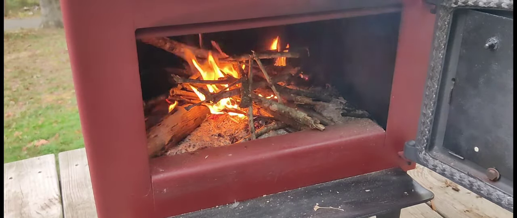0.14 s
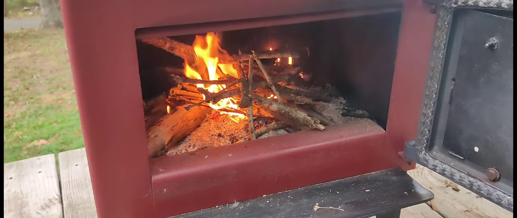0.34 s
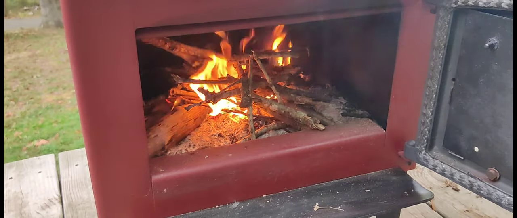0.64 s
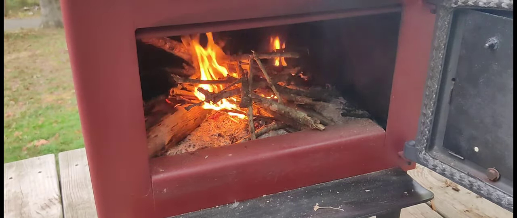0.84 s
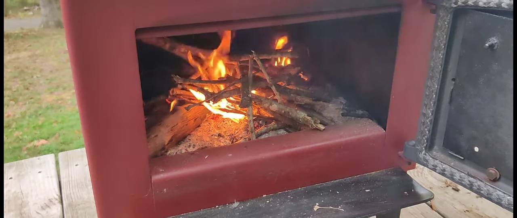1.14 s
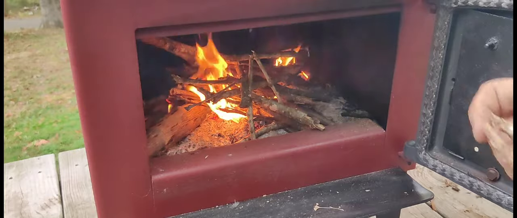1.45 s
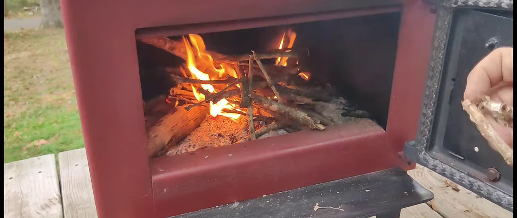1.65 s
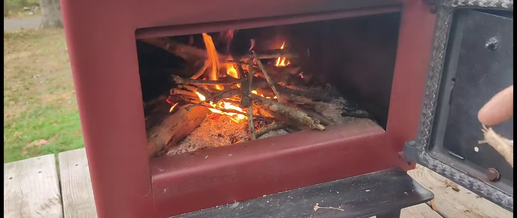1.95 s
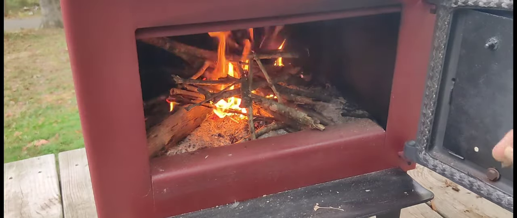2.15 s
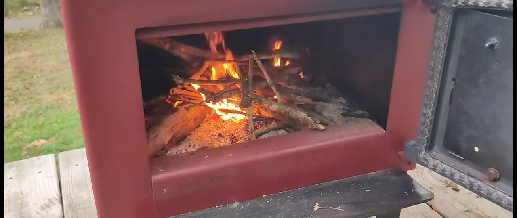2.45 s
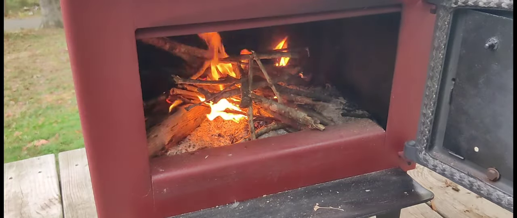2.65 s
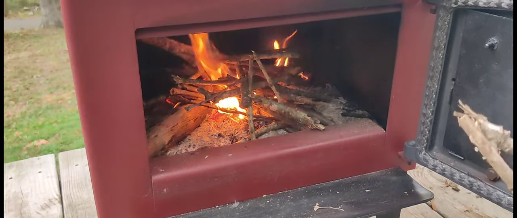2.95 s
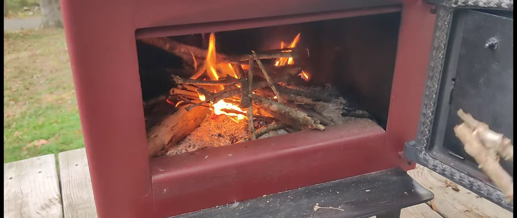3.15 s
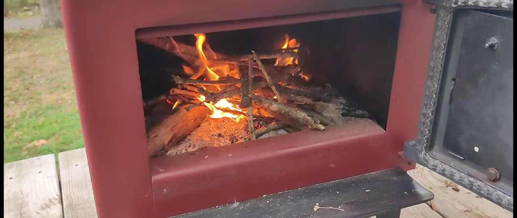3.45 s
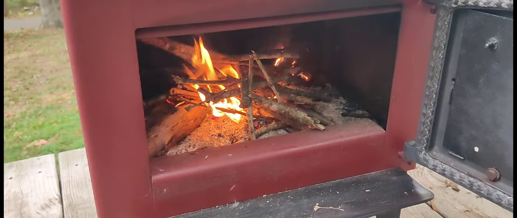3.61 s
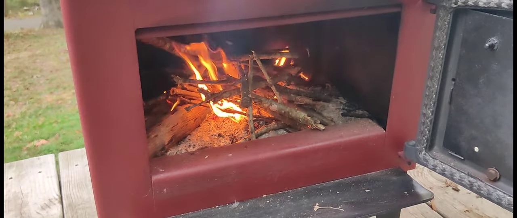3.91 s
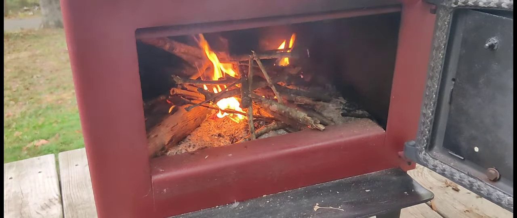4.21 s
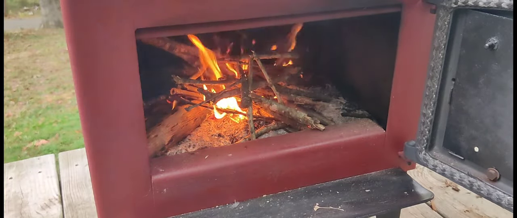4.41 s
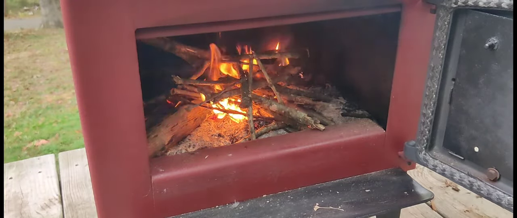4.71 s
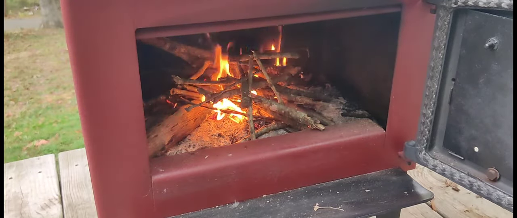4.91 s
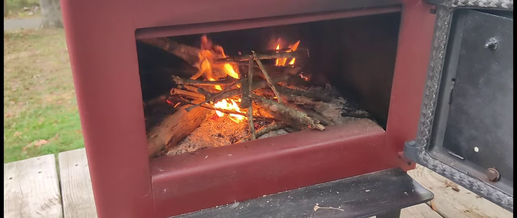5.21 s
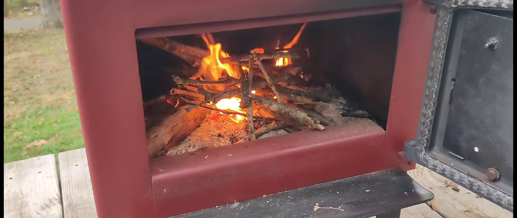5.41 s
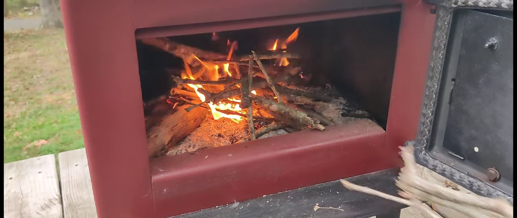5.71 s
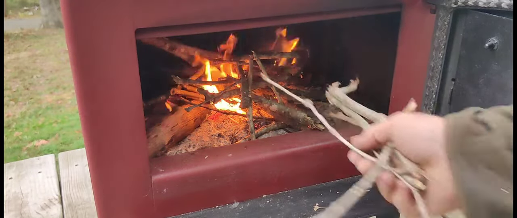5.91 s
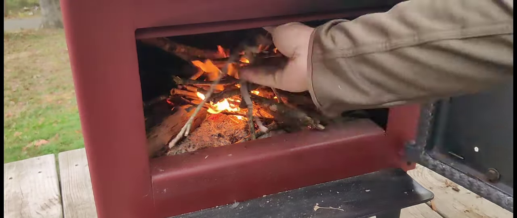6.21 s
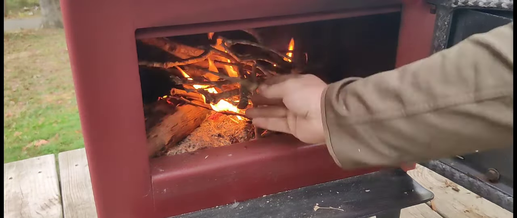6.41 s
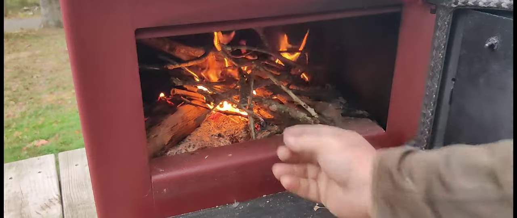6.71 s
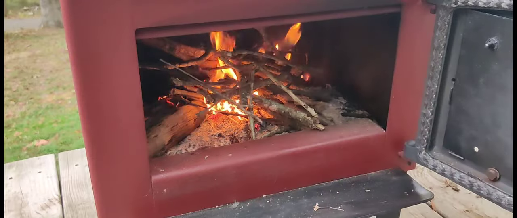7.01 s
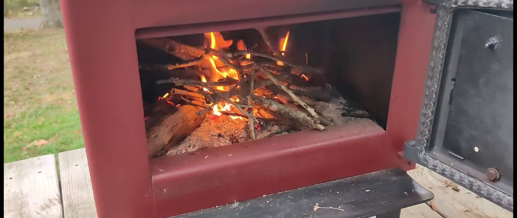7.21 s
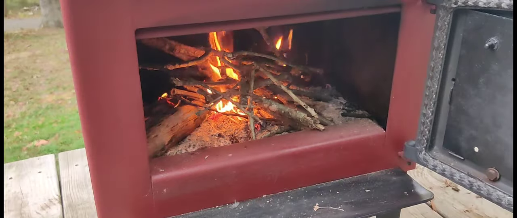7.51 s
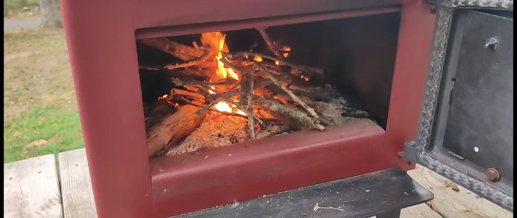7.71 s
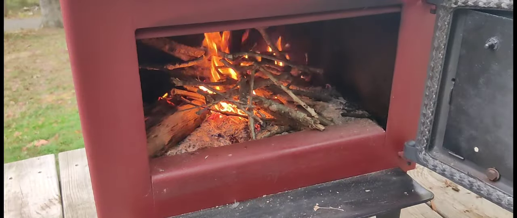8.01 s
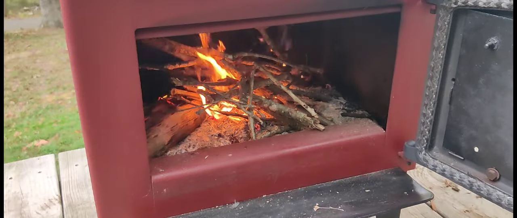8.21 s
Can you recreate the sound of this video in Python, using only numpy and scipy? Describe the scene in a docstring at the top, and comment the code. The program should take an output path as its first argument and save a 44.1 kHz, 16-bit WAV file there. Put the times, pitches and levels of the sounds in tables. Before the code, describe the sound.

A close outdoor stereo scene beside an open iron stove. From 0 s, low wind buffets push mainly on the right, over a faint wavering engine hum, a fast high insect chirp and brief songbird whistles and buzzes. Small dry snaps and sleeve swishes begin around 0.4 s; sticks rub, rasp and crack at 1.2-2.1 s, then more sparsely. At 3.35-3.45 s comes the loudest moment, a hard, sharp multiple break with a woody knock and puff of air, followed by smaller cracks to 4.8 s. A distant crow gives six short, echoing caws from 4.4 to 6.3 s. At 6.3-6.65 s sticks tumble into the firebox with low wooden thuds and dull, short iron ringing. Handling nearly stops around 7 s, leaving tiny fire ticks, birds and air, which dips briefly near 7.4 s. Soft low knocks, scrapes and little cracks return from 7.8 s to the end at about 8.3 s.

```python
"""Wind on the microphone, a far engine's hum and a chirping insect come first, with songbirds calling over them.
Close by, dry sticks are gathered, snapped and dropped into an open iron stove outdoors, which rings dully as
a small fire ticks; far off a crow calls six times. Wood is bursts and rubbing of noise plus decaying modes,
the stove is a bank of iron modes, wind and air are coloured noise, and the hum, insect and bird calls are
wavering tones. Two microphone ports pick it all up, the right one exposed to the gusts."""
import sys
import numpy as np
from scipy import signal
from scipy.fft import rfft, irfft, next_fast_len
from scipy.io import wavfile
from scipy.ndimage import uniform_filter1d, map_coordinates

SR = 44100
rng = np.random.default_rng(int(sys.argv[2]) if len(sys.argv) > 2 else 0)


def output_pcm(signal):
    """Save a mono or channel-first signal as 16-bit PCM at the path in sys.argv[1].

    Samples are clipped to [-1, 1] before scaling.
    """
    pcm = np.clip(np.atleast_2d(signal).T, -1, 1) * 32767
    wavfile.write(sys.argv[1], SR, np.round(pcm).astype(np.int16))


N = 368235  # length in samples


def amp(db):
    """Decibels to gain."""
    return 10 ** (np.asarray(db) / 20)


def unit(x):
    """Scale to rms 1."""
    return x / np.sqrt(np.mean(x ** 2) + 1e-20)


def along(points, hz):
    """(Hz, value) points read on a log axis."""
    f, v = np.transpose(points)
    return np.interp(np.log(hz + 1), np.log(f), v)


def curves(rows):
    """One value per sample for each column after the time."""
    s, *cols = np.transpose(rows)
    return [np.interp(np.arange(N) / SR, s, c) for c in cols]


def wobble(rate, size=N):
    """A smooth random curve, rate knots a second."""
    knots = rng.standard_normal(int(size * rate / SR) + 4)
    return map_coordinates(knots, [np.arange(size) * rate / SR])


def filtered(x, response):
    """x times a response of frequency."""
    m = next_fast_len(N + SR // 2)
    return irfft(rfft(x, m) * response(np.fft.rfftfreq(m, 1 / SR)), m)[..., :N]


def coloured(x, spectrum, keep_power=True, size=4096):
    """Causal (minimum-phase) filter through (Hz, dB) points."""
    cepstrum = irfft(np.log(amp(along(spectrum, np.fft.rfftfreq(size, 1 / SR)))))
    # folding the cepstrum forward in time makes the filter causal
    cepstrum[1:size // 2] *= 2
    cepstrum[size // 2 + 1:] = 0
    kernel = irfft(np.exp(rfft(cepstrum)))
    if keep_power:
        kernel = kernel / np.linalg.norm(kernel)
    return signal.fftconvolve(np.atleast_2d(x), kernel[None], axes=1)[:, :N]


def pair(alike, size=N):
    """Two white noises that share a part, from 0 (separate) to 1 (identical)."""
    a, b, common = rng.standard_normal((3, size))
    share = np.clip(alike, 0, 1)
    return np.sqrt(1 - share) * np.array([a, b]) + np.sqrt(share) * common


def pan(db):
    """Left and right gains for a level difference, positive to the left."""
    return amp([[db / 2], [-db / 2]])


def add(track, s, sound):
    """Mix a sound into a track at s seconds."""
    start = max(round(s * SR), 0)
    track[..., start:start + sound.shape[-1]] += sound[..., :N - start]


def echo(x, t60):
    """Diffuse stereo reflections: decaying noise with about unit energy."""
    t = np.arange(SR) / SR
    tail = rng.standard_normal((2, SR)) * amp(-60 * t / t60) * (1 - np.exp(-t / 0.00057))
    return signal.fftconvolve(np.atleast_2d(x), tail / np.linalg.norm(tail[0]), axes=1)[:, :N]


def swell(s, length):
    """A gain that rises smoothly to 1 at s seconds and falls again."""
    return np.exp(-np.minimum((2 * (np.arange(N) / SR - s) / length) ** 2, 30))


def from_yard(x, lag_s=0.00036):
    """Sound from the yard reaches the left port later."""
    return filtered(x, lambda hz: np.exp(-2j * np.pi * hz * np.array([[lag_s], [0]])))


# Wood fibres breaking close to the microphone. Each row: start in seconds, crack level in dB, thud in dB
# relative to the crack, tearing t60 in seconds, left over right in dB, gain of the top octave in dB.
FIBRE_BREAKS = [(.3764, -42.5, -22, .027, 2, 0), (0.409, -38, -4.5, .02, 1, 2),
                (0.427, -34.5, -20, 0.0263, -1, 7), (0.446, -40.5, -17, .018, -7, 1),
                (.4924, -30, -33, 0.017, -1, -3), (0.5528, -47.5, -12, .03, -11, 2),
                (.654, -49, -22, .012, 0, 5), (.931, -54, -17, .01, -9, 5), (1.042, -43, -20, .01, -8, -6),
                (1.239, -43, -14, 0.017, -3, 1), (1.245, -44.5, 1, .02, -13.5, -6),
                (1.257, -39, -15, 0.019, -7.5, -6.5), (1.265, -32, -22, .012, -4, -14.5),
                (1.306, -38, -17, .012, -3, -7), (1.577, -47, -20, .015, 2, 7),
                (1.587, -34, -27, 0.097, -2, -2), (1.597, -51.5, -16, .022, -6, -7),
                (1.691, -50, -20, .012, 1, 4), (1.696, -37.5, -24, 0.01, 0, 7),
                (1.713, -53, -19, .018, -4, 15), (1.769, -31.5, -16, 0.041, -4, -12),
                (1.78, -46, 5, .027, -4, 0), (1.813, -46, -20, 0.017, -6, 6),
                (1.832, -45, -12, .014, -1.5, 9), (1.872, -40, -6, .024, 2, -2),
                (2.0212, -45.5, -7.5, .018, -5.5, -2), (2.127, -44, -0.5, 0.04, -14, -2),
                (2.455, -43.5, -21, 0.066, -6, 0.5), (2.635, -40, -17, 0.0088, -5, -21),
                (2.734, -42.5, -6, .009, 0, -7), (2.998, -47, -18, .01, 5, 0),
                (3.277, -40.5, -10, 0.015, -6, -7), (3.312, -44.5, -18, .022, -3, 5),
                (3.33, -40, -7, 0.04, 2, 4), (3.3464, -12, -20, 0.0049, -7.5, -3),
                (3.3928, -20, -3.5, 0.027, -6.5, -1), (3.394, -17.5, -12.5, 0.022, 6, 3),
                (3.4046, -39, -22, .02, 2.5, 0), (3.416, -22.5, -26, 0.032, 4, 3),
                (3.431, -41, -20, .02, 9, -1), (3.454, -42.5, -2, .02, 12.5, -1),
                (3.5608, -37.5, -6.5, 0.016, -4, 3.5), (3.568, -42.5, -12, .012, 0, 5),
                (3.575, -44, -4, .022, 10, -2), (3.664, -36.5, -4, 0.017, -7, -3),
                (3.68, -43.5, -22, .012, -6, 2), (3.687, -45, -20, .012, -5, -2.5),
                (3.6959, -23, -11.5, 0.014, -3.5, -8), (3.788, -45, -22, .01, -12, -5),
                (3.8168, -28.5, -35, 0.011, -8, -4.5), (3.9582, -42.5, -20, 0.029, -8.5, -3),
                (3.973, -49, -22, .012, -4, 4), (4.007, -52, -20, .01, -5, 9),
                (4.0237, -34.5, -2, 0.033, -3.5, -6), (4.0315, -41, 1, .02, -5, -7),
                (4.381, -51, -22, 0.011, -11, 4), (4.497, -33, -28, 0.023, -6, -0.5),
                (4.537, -39, -6, .012, -5, -12), (4.605, -26, -20, 0.0098, -4.5, 3),
                (4.654, -51, -25, .008, -11, 6), (4.717, -41, -25, 0.007, -13, -3),
                (4.8025, -38.5, -13, 0.01, -7, -14), (5.176, -45, -20, .01, -7, -18),
                (5.59, -44, -22, .01, -4, 2), (5.724, -44, -20, .01, 1, 0), (5.77, -43, -20, .01, -4, -15),
                (6.3, -49, 4, .02, 5, 3), (6.4366, -38, -13, 0.026, 1.5, -4),
                (6.4662, -36.5, -22, 0.013, 0, -3), (6.4972, -51.5, -15, 0.036, 18, 10),
                (7.7907, -47, -20, .02, 4, -7), (7.889, -44, -6, 0.024, 3, -8),
                (7.98, -52.5, 6, 0.022, 2, -6), (8.022, -45.5, -5, 0.033, 10, -2),
                (8.066, -51.5, -17, 0.011, 3, 5)]
# Modes of the thick stick that breaks. Each row: pitch in Hz, level in dB, t60 in seconds.
THICK_STICK_MODES = [(1500, -11, 0.015), (2374, -3, 0.013), (2644, -6, 0.017), (3750, -7.5, 0.01),
                     (5030, 5, 0.0095)]
# Colour of a sharp crack, also worn by the fire's ticks. Each row: frequency in Hz, relative level in dB.
CRACK_COLOUR = [(200, -34), (1000, -19.5), (2300, -13.5), (3500, -10), (5000, -1), (7500, 8), (10000, 3.5),
                (14000, 3.5), (16000, 3.5)]
# Colour of the woody thud. Each row: frequency in Hz, relative level in dB.
THUD_COLOUR = [(80, -3), (200, 9.5), (400, 0), (700, 3.5), (1400, -6), (2300, 0.5), (4000, -9), (9000, -41)]
STICK_DB, STICK_GROWS = -5.5, 1.6  # only hard breaks ring it: level, growth with the snap
SHEEN_HZ = 8340  # where the top octave of a snap begins


def snaps(ring_db=-17, ring_t60=0.015, rise_s=0.00089):
    """Each break: a sharp crack, a fast run of tearing fibres, a brief ring of random high tones, a woody thud."""
    cracks, thuds, stick = np.zeros((3, 2, N))
    t = np.arange(SR // 8) / SR
    rise = 1 - np.exp(-t / rise_s)
    modes = [amp(db - 60 * t / t60) * np.sin(2 * np.pi * hz * t) for hz, db, t60 in THICK_STICK_MODES]
    stick_ring = rise * sum(modes)
    dull = signal.butter(2, SHEEN_HZ, fs=SR, output="sos")
    for s, db, thud_db, t60, side_db, sheen_db in FIBRE_BREAKS:
        fibres = amp(4.5 * unit(uniform_filter1d(rng.standard_normal(len(t)), size=24)))
        edge = amp(-60 * t / 0.005)
        tearing = .38 * fibres * amp(-60 * t / max(t60, .004))
        tear = pair(0.28, size=len(t)) * (edge + tearing)
        tones_hz = rng.uniform(2000, 10860, size=(12, 1))  # random tones for each snap
        ring = unit(np.sin(2 * np.pi * tones_hz * t).sum(0)) * amp(ring_db - 60 * t / ring_t60)
        burst = rise * (tear + ring)
        burst = burst / np.std(burst[:, :SR // 500])  # level set by the first 2 ms
        low = signal.sosfiltfilt(dull, burst)
        thud = pair(0.69, size=len(t)) * rise * amp(-60 * t / 0.03)
        add(cracks, s, amp(db) * pan(side_db) * (low + amp(sheen_db) * (burst - low)))
        add(thuds, s, amp(db + thud_db) * pan(side_db) * thud)
        add(stick, s, amp(STICK_DB + STICK_GROWS * db) * pan(-6.0) * stick_ring)
    return coloured(cracks, CRACK_COLOUR) + amp(-5.0) * coloured(thuds, THUD_COLOUR) + stick


def puff(s=3.394, suction_s=0.012, rebound_s=0.099, rebound=0.43):
    """The breaking stick throws air at the right port: one suction and a slow rebound."""
    t = np.maximum(np.arange(N) / SR - s, 0)

    def bump(peak_s):
        return t / peak_s * np.exp(1 - t / peak_s)

    right_only = amp(-6.2) * np.array([[0], [1]])
    return right_only * (rebound * bump(rebound_s) ** 6 - bump(suction_s))


# Sticks bumping the deck and the stove. Each row: start in seconds, level in dB, centre of the blow in Hz,
# its t60 in seconds, iron ring in dB relative to that level.
STICK_KNOCKS = [(1.383, -39, 817, 0.065, -27), (1.592, -52, 1050, 0.086, -2), (1.685, -47, 1244, .08, -1.5),
                (1.77, -58, 1210, .08, 8.5), (3.393, -17.5, 1426, 0.016, -35),
                (3.394, -30.5, 703, 0.02, -29), (6.339, -46, 1920, .06, -15), (6.341, -47, 555, 0.07, -6),
                (6.345, -41.5, 1096, 0.12, -7), (6.354, -39.5, 1133, 0.13, -22),
                (6.414, -32, 429, 0.13, -17), (6.442, -23.5, 790, 0.086, -19),
                (6.447, -29, 657, 0.042, -21.5), (6.474, -34, 733, 0.13, -14.5),
                (6.492, -43, 890, 0.052, -14), (6.52, -41, 790, 0.1, -23), (6.565, -52, 595, .06, -14),
                (6.645, -48, 694, 0.13, -22), (7.926, -38, 197, 0.083, -25), (7.929, -42, 716, 0.092, -22),
                (7.936, -39.5, 459, 0.27, -19), (7.952, -43, 690, .08, -27), (7.973, -43, 640, 0.071, -34),
                (7.987, -47, 358, 0.13, -24), (8.08, -44.5, 398, 0.15, -27), (8.128, -44, 975, .11, -24),
                (8.138, -43, 405, 0.11, -20), (8.193, -48, 654, 0.069, -26),
                (8.276, -41.5, 498, 0.085, -25), (8.335, -36, 420, .1, -25)]
# Modes of the firebox with its load. Each row: pitch in Hz, level in dB, t60 in seconds.
IRON_MODES = [(418, -7.5, 0.38), (538, -8.5, 0.32), (594.4, 1, 0.32), (632, -11, 0.54), (699, -5, 0.37),
              (763, -1.5, 0.33), (826, -8, .4), (870, -7, 0.42), (987, -8.5, 0.52), (1090, -16.5, 0.6),
              (1120, -23, 0.48), (1520, -13.5, 0.43), (1760, -25, .3), (1950, -19.5, .2)]
# Modes of a bumped stick. Each row: ratio to the centre of the blow, level in dB.
WOOD_MODES = [(.82, -7.5), (1, -1), (1.19, -16)]


def firebox(spread=0.48, contact_s=0.0026, clatter_db=-5):
    """Each bump knocks the stick's own short modes, with a little clatter, and rings iron modes near that pitch."""
    out = np.zeros((2, N))
    t = np.arange(SR * 3 // 5) / SR
    hz, level_db, t60 = np.transpose(IRON_MODES)[:, :, None]
    ratio, wood_db = np.transpose(WOOD_MODES)[:, :, None]
    for s, db, centre_hz, knock_t60, ring_db in STICK_KNOCKS:
        octaves_off = np.log2(hz / centre_hz)
        strength = amp(level_db + rng.normal(0, 1.6, hz.shape)) / (1 + (octaves_off / spread) ** 4)
        # phases differ a little between the ports
        phase = rng.uniform(0, 2 * np.pi, hz.shape) + rng.normal(0, 0.47, (2, len(hz), 1))
        ring = np.sum(strength * amp(-60 * t / t60) * np.sin(2 * np.pi * hz * t + phase), axis=1)
        wood_hz = centre_hz * ratio * (1 + rng.normal(0, 0.03, ratio.shape))
        wood = np.sum(amp(wood_db) * np.sin(2 * np.pi * wood_hz * t), axis=0)
        band = signal.butter(2, [centre_hz * 0.73, centre_hz * 1.21], "band", fs=SR, output="sos")
        clatter = unit(signal.sosfilt(band, pair(0.24, size=len(t))))
        knock = (wood + amp(clatter_db) * clatter) * amp(-60 * t / knock_t60)
        onset = 1 - np.exp(-t / contact_s)
        add(out, s, amp(db) * onset * (amp(ring_db) * ring + amp(-7.0) * knock))
    return out


# Faint rustle while the hands are busy near the microphone. Each row: time in seconds, level in dB.
BUSY_HANDS = [(0, -68), (.35, -62.5), (.9, -63), (2.55, -60), (2.9, -66.5), (3.5, -61), (3.8, -59.5),
              (4.7, -58.5), (5.3, -61.5), (6.5, -63.5), (6.8, -72.5), (7.3, -78.5), (7.85, -85),
              (7.9, -58.5), (8.35, -71)]
# Strokes of the sleeve. Each row: peak in seconds, length in seconds, level in dB.
SLEEVE_STROKES = [(0.43, 0.066, -42.5), (0.553, 0.081, -50), (0.778, 0.033, -51.5), (0.923, 0.19, -53),
                  (1.113, 0.11, -44), (1.366, 0.23, -50), (1.714, 0.11, -53.5), (1.853, 0.1, -47),
                  (2.014, 0.044, -49), (2.15, 0.05, -49.5), (2.468, 0.29, -60), (2.573, 0.09, -58),
                  (2.738, 0.041, -49), (3.426, 0.052, -43.5), (3.575, 0.029, -46.5), (4.187, 0.042, -49.5),
                  (4.48, 0.27, -55.5), (4.708, 0.098, -47.5), (5.006, 0.04, -51.5), (5.354, 0.096, -56.5),
                  (5.58, 0.038, -41.5), (5.696, 0.2, -57), (6.309, 0.094, -50), (6.478, 0.14, -53),
                  (7.993, 0.19, -61)]
# Sticks dragged over one another. Each row: peak in seconds, length in seconds, bark rasp in dB, dull scrape in dB.
STICK_DRAGS = [(1.273, 0.12, -60, -55), (1.401, 0.13, -55, -50), (1.593, 0.036, -47, -57),
               (1.657, 0.079, -44.5, -65), (1.782, 0.047, -54.5, -69), (2.144, 0.06, -57, -56),
               (3.425, 0.072, -55, -51), (3.638, 0.12, -70, -53), (3.704, 0.028, -46.5, -59),
               (3.838, 0.11, -61, -50.5), (4.067, 0.039, -54.5, -77), (4.546, 0.15, -58.5, -61.5),
               (5.674, 0.078, -61, -60.5), (6.353, 0.068, -70, -49), (6.442, 0.09, -80.5, -53.5),
               (6.59, 0.16, -65, -60), (7.963, 0.06, -73, -54), (8.025, 0.041, -58, -58),
               (8.16, 0.21, -65.5, -59.5)]
FIDGET_DB, FIDGET_RATE = 3, 9  # unevenness of the rustle: depth, random knots a second
SLEEVE_RASP_DB, SLEEVE_SCRAPE_DB = -11.5, -33  # each stroke shifts the held sticks a little
BUSY_RASP_DB, BUSY_SCRAPE_DB = -2, -5  # bark and scrape in the busy rustle


def handling():
    """Strength of swish, rasp and scrape: sleeve strokes and dragged sticks over a fidgeting rustle."""
    busy_db, = curves(BUSY_HANDS)
    busy = amp(busy_db + FIDGET_DB * wobble(FIDGET_RATE))
    sleeve = sum(amp(db) * swell(s, length) for s, length, db in SLEEVE_STROKES)
    bark, dull = sum(amp([[rasp_db], [scrape_db]]) * swell(s, length)
                     for s, length, rasp_db, scrape_db in STICK_DRAGS)
    swishing = np.hypot(sleeve, busy)
    rasping = np.hypot(bark + amp(SLEEVE_RASP_DB) * sleeve, amp(BUSY_RASP_DB) * busy)
    scraping = np.hypot(dull + amp(SLEEVE_SCRAPE_DB) * sleeve, amp(BUSY_SCRAPE_DB) * busy)
    return swishing, rasping, scraping


# Colour of cloth sliding on cloth. Each row: frequency in Hz, relative level in dB.
SWISH_COLOUR = [(3000, -42), (6000, -4), (8000, -1), (11000, -0.5), (14000, -1.5), (16000, -2.5)]
# Colour of rasping bark. Each row: frequency in Hz, relative level in dB.
BARK_COLOUR = [(500, -13.5), (1200, -3.5), (2300, -2), (4000, 2), (5800, 2), (7500, 5), (11000, -5.5)]
# Colour of the dull scrape. Each row: frequency in Hz, relative level in dB.
SCRAPE_COLOUR = [(100, -4), (250, 13), (450, 5.5), (800, 2), (1300, -5.5), (2500, -6), (5000, -11),
                 (10000, -50)]


def rustle(grain_rate=230, spread_db=2.0):
    """A sleeve swishes; bark catches and slips in dense tiny grains over a duller, uneven scrape."""
    swishing, rasping, scraping = handling()
    sizes = (rng.random(N) < grain_rate / SR) * amp(spread_db * np.minimum(rng.exponential(size=N), 4))
    grains = signal.lfilter([1], [1, -np.exp(-1 / (0.00068 * SR))], sizes)  # decay constant 0.68 ms
    swish = coloured(unit(pair(0.16) * (grains + 1.9)), SWISH_COLOUR)
    grit = unit(pair(.2) * (grains + .9))
    rasp = coloured(grit, BARK_COLOUR) * pan(-2.8)
    uneven = amp(4.3 * np.tanh(wobble(70)))
    scrape = coloured(unit(pair(0.41) * uneven), SCRAPE_COLOUR) * pan(-1.3)
    return swishing * swish + rasping * rasp + scraping * scrape


def embers(rate=16, spread_db=1.5):
    """Tiny gas pockets burst at random in the burning twigs, rate a second; their level follows the open air's."""
    sizes = (rng.random(N) < rate / SR) * amp(spread_db * np.minimum(rng.exponential(size=N), 3))
    ticks = signal.lfilter([1], [1, -np.exp(-1 / (0.00014 * SR))], sizes)
    air_db, = curves(OPEN_AIR)
    return amp(air_db + 5) * pan(-4) * coloured(ticks * pair(0.64), CRACK_COLOUR)


# Light breeze on both microphone ports. Each row: time in seconds, buffet level in dB.
LIGHT_BREEZE = [(0, -66), (.65, -54), (1.3, -45.5), (1.8, -52), (2.25, -38.5), (2.6, -62), (3.35, -42.5),
                (3.7, -46.5), (4.3, -46), (4.85, -39), (5.1, -35.5), (5.5, -44), (5.95, -36.5), (6.5, -39),
                (6.9, -54.5), (7.35, -63), (7.65, -45.5), (8.35, -41)]
# Gusts on the exposed right port. Each row: peak in seconds, length in seconds, buffet level in dB.
PORT_GUSTS = [(0.2, 0.37, -27.5), (1.039, 0.057, -28), (1.707, 0.075, -33), (1.99, 0.28, -33),
              (2.214, 0.096, -30), (2.429, 0.052, -25), (2.544, 0.19, -29), (2.745, 0.12, -20.5),
              (2.979, .22, -25.5), (3.298, 0.037, -29.5), (3.42, 0.031, -27), (4.178, 0.17, -34.5),
              (4.366, 0.19, -34.5), (4.45, 0.031, -30), (4.535, 0.034, -33.5), (4.63, 0.14, -28.5),
              (4.776, 0.025, -24), (4.843, 0.062, -22.5), (4.93, 0.086, -27), (5.047, 0.13, -27),
              (5.147, 0.078, -23.5), (5.354, 0.14, -28), (5.645, 0.094, -30.5), (6, 0.018, -18),
              (6.108, 0.11, -33), (6.376, 0.041, -21.5), (6.438, 0.048, -20.5), (6.471, 0.027, -19.5),
              (6.592, 0.12, -25.5), (7.557, 0.069, -33.5), (7.895, 0.055, -31), (8.05, 0.048, -30),
              (8.128, 0.032, -28.5), (8.196, 0.053, -25)]
# Colour of wind buffeting a port. Each row: frequency in Hz, relative level in dB.
BUFFET_COLOUR = [(10, -1), (25, 4), (50, -2.5), (100, -13), (160, -30), (250, -48.5), (500, -58),
                 (1200, -74.5)]
LEE_DB = -16.5  # share of a gust that reaches the sheltered left port
# small eddies: level, growth with the gust, how much higher they sound
FINE_DB, FINE_GROWS, FINE_RATIO = 13, 1.82, 1.59


def wind():
    """A breeze stirs both ports; gusts hit mostly the right one, and small eddies grow faster than the gust."""
    breeze_db, = curves(LIGHT_BREEZE)
    gust_power = sum((amp(db) * swell(s, length)) ** 2 for s, length, db in PORT_GUSTS)
    gust = np.sqrt(gust_power) * np.array([[amp(LEE_DB)], [1]])
    eddies = filtered(rng.standard_normal((2, N)), lambda hz: amp(along(BUFFET_COLOUR, hz)))
    fine = filtered(rng.standard_normal((2, N)), lambda hz: amp(along(BUFFET_COLOUR, hz / FINE_RATIO)))
    lumps = amp(4.35 * np.tanh(wobble(25)))
    strength = np.hypot(amp(breeze_db) * pan(-1.8), gust)
    return strength * unit(eddies * lumps) + amp(FINE_DB) * gust ** FINE_GROWS * unit(fine * lumps)


def insects(rate=13.6, pitch_hz=6160, arch=0.064, duty=0.42):
    """One near insect rises and falls in pitch with each wing stroke; a chorus hisses behind it."""
    air_db, = curves(OPEN_AIR)
    cycle = np.cumsum(rate * (1 + 0.0202 * wobble(4))) / SR % 1
    stroke = np.minimum(cycle / duty, 1)  # silent for the rest of the cycle
    hz = pitch_hz * (1 - arch * (2 * stroke - 1.1) ** 2 + 0.01 * wobble(600))
    chirp = np.sin(np.pi * stroke) * np.sin(2 * np.pi * np.cumsum(hz) / SR)
    hiss_colour = [(4000, -43.5), (5300, -10.5), (5800, 0.0), (6150, -10), (6450, -10), (7200, -42.5)]
    chorus = coloured(pair(0.27), hiss_colour)
    return amp(air_db) * (amp(-7.0) * from_yard(chirp) * pan(8.3) + amp(-22) * chorus * pan(0.73))


# The songbirds' repertoire, by note label. Each entry: length in seconds, start, middle and end pitch in Hz,
# buzz as a number from 0 (pure) to about 1 (rough). The first entry is a dip: a short whistle that dips,
# then sweeps up to end higher than it began, whatever its label suggests.
BIRD_NOTES = {"fall": (0.051, 4980, 4300, 6400, .06), "rise": (0.099, 3080, 3480, 4000, .083),
              "climb": (.11, 3400, 3650, 5300, .08), "pipe": (0.23, 3320, 3180, 3030, 0.069),
              "zip": (0.066, 2200, 2400, 1900, 1.07), "churr": (.081, 2000, 2120, 2600, 0.54)}
# Songbird calls. Each row: start in seconds, note label, level in dB before the song's common gains.
SONG_CALLS = [(.044, "zip", -63.5), (.05, "pipe", -75), (.25, "zip", -65), (.685, "rise", -73),
              (.84, "churr", -65.5), (.9, "rise", -71), (1.145, "zip", -63), (2.68, "fall", -63),
              (2.841, "rise", -64), (4.345, "zip", -61), (5.755, "fall", -66), (5.91, "rise", -69),
              (6.12, "climb", -66.5), (6.715, "rise", -72.5), (7.1, "churr", -73), (7.361, "pipe", -81),
              (7.493, "fall", -67), (7.625, "rise", -71.5)]
SONG_ECHO_DB, SONG_ECHO_T60 = -0.5, .5  # level, seconds
SONG_FADING_DB, SONG_FADING_RATE = 4, 100  # leaves break up the whistles: depth, random knots a second


def songbirds():
    """Songbirds slur and buzz as gliding tones, broken up by leaves and lingering in the trees."""
    song = np.zeros(N)
    buzz = wobble(900)
    for s, note, db in SONG_CALLS:
        length, start_hz, middle_hz, end_hz, rough = BIRD_NOTES[note]
        u = np.linspace(0, 1, round(length * SR))
        hz = np.polyval(np.polyfit([0, .5, 1], [start_hz, middle_hz, end_hz], 2), u)
        hz = hz * (1 + 0.2 * rough * buzz[round(s * SR):][:len(u)])
        envelope = np.abs(np.sin(np.pi * u)) ** 0.12
        add(song, s, amp(db) * envelope * np.sin(2 * np.pi * np.cumsum(hz) / SR))
    song = song * amp(-SONG_FADING_DB * np.abs(wobble(SONG_FADING_RATE)))
    trees = amp(SONG_ECHO_DB) * echo(song, t60=SONG_ECHO_T60)
    return amp(4.5) * from_yard(song, lag_s=0.00005) + trees


# Calls of the distant crow. Each row: start in seconds, level in dB.
CROW_CALLS = [(4.405, -57.5), (4.755, -56.5), (5.113, -57.5), (5.478, -58.5), (5.855, -59.5),
              (6.245, -56.5)]
# Resonances of the crow's throat. Each row: frequency in Hz, gain in dB.
CROW_THROAT = [(600, -31), (700, -6.5), (780, 1), (1000, -25), (1180, -8), (1330, 5), (1560, 5.5),
               (1830, 1.5), (2100, -4), (2330, -2.5), (3100, -27), (3850, -15.5)]
# Colour of the crow's echo from the trees. Each row: frequency in Hz, gain in dB.
TREE_COLOUR = [(600, -1), (800, -1), (1100, -14), (1350, 0.5), (1550, 1), (1900, -4), (4000, -13)]
# length in seconds, highest pitch, share lost at the ends, place of the crest 0-1
CAW_S, CAW_TOP_HZ, CAW_SAG, CAW_CREST = .145, 776, .25, .38
CAW_RISE, CAW_FALL = .24, 0.51  # widths of the quick climb and the slower fall, as shares of the caw
CAW_ROUGH, CAW_FADING_DB = 0.017, 4  # pitch jitter; each partial fades on its own on the way
WALL_S, WALL_DB = .011, -7.5  # a wall returns the crow from the other side: delay, level
CROW_ECHO_DB, CROW_ECHO_T60 = -6, 1.0  # level, seconds


def crow():
    """A far crow's arched caws: five harmonics through its throat, a wall's return and an echo in the trees."""
    caws = np.zeros(N)
    u = np.linspace(0, 1, round(CAW_S * SR))
    width = np.where(u < CAW_CREST, CAW_RISE, CAW_FALL)
    arch = 1 - CAW_SAG * (1 - np.exp(-((u - CAW_CREST) / width) ** 2))
    fade = np.minimum(10 * np.minimum(u, 1 - u), 1)
    for s, db in CROW_CALLS:
        hz = arch * CAW_TOP_HZ * (1 + CAW_ROUGH * wobble(304, size=len(u)))
        phase = 2 * np.pi * np.cumsum(hz) / SR
        voice = 0
        for k in range(1, 6):
            partial_db = along(CROW_THROAT, k * hz) + CAW_FADING_DB * wobble(43, size=len(u))
            voice = voice + amp(partial_db) * np.sin(k * phase)
        add(caws, s, amp(db) * fade * voice)
    trees = amp(CROW_ECHO_DB) * coloured(echo(caws, t60=CROW_ECHO_T60), TREE_COLOUR, keep_power=False)
    wall = amp(WALL_DB) * from_yard(np.roll(caws, round(WALL_S * SR)), lag_s=-0.00024)
    return from_yard(caws, lag_s=0.00027) + wall + trees


# Far engine. Each row: time in seconds, hum level in dB.
FAR_ENGINE = [(0, -54.5), (.25, -54), (.72, -60), (1.5, -49.5), (1.8, -56.5), (2.8, -56.5), (3.8, -55),
              (4.4, -62.5), (5.0, -49.5), (5.45, -64), (6.55, -49.5), (7.1, -58), (7.42, -65), (7.74, -52),
              (8.35, -50.5)]
# Open air, sinking briefly near the end; insects and embers follow it. Each row: time in seconds, level in dB.
OPEN_AIR = [(0, -54), (1, -53), (2.5, -53), (4, -56.5), (5.5, -52.5), (6.6, -52.5), (7.15, -57),
            (7.28, -64), (7.42, -74), (7.49, -56), (7.8, -56), (8.35, -53.5)]
# Colour of the open air. Each row: frequency in Hz, relative level in dB.
AIR_COLOUR = [(30, 12.5), (150, 1.5), (250, -7.5), (450, -11), (750, -10), (1200, -15.5), (2000, -18.5),
              (3200, -21), (5000, -20), (8000, -19.5), (11000, -26.5), (16000, -29.5)]


def outdoors():
    """Soft open-air noise and the rough, wavering drone of a far engine: low noise and a tone near 122 Hz."""
    air_db, = curves(OPEN_AIR)
    hum_db, = curves(FAR_ENGINE)
    air = amp(air_db + 1.4 * wobble(1.6)) * coloured(pair(0.5), AIR_COLOUR)
    drone_colour = [(40, -20.0), (62, -7.0), (85, -3.0), (108, 5.0), (123, 7.5), (145, -0.5),
                    (185, -40.0), (230, -21.5), (500, -57.5)]
    rumble = coloured(pair(0.97), drone_colour)
    firing = np.sin(2 * np.pi * np.cumsum(122 * (1 + 0.026 * wobble(15))) / SR)
    drone = rumble + amp(-3.0 + 4.45 * wobble(8.9)) * firing
    return from_yard(air + amp(hum_db) * drone * pan(-0.35))


def scene():
    """Near wood sounds bounce briefly off stove and deck; the yard lies behind."""
    wood = snaps() + embers()
    bounce = amp(-13) * echo(wood, t60=.075)
    near = wood + bounce + rustle() + firebox() + puff()
    yard = insects() + songbirds() + crow() + outdoors()
    return near + wind() + yard


# Cavity resonances of the left microphone port. Each row: frequency in Hz, gain in dB.
LEFT_CAVITY = [(200, 1.5), (1000, 1), (4000, 4.5), (5900, -3.5), (6600, -6), (7600, 1), (9800, 0.5),
               (11300, -6.5), (13000, 3), (15500, -14.5)]
# Cavity resonances of the right microphone port. Each row: frequency in Hz, gain in dB.
RIGHT_CAVITY = [(200, 2), (1000, 1.5), (3200, 4.5), (4900, 6), (5700, 9), (6250, 12.5), (7000, -1),
                (8100, -9), (9500, -4), (11000, 0), (14000, 4.5), (15500, 1.5)]
TOP_HZ = 15800  # band limit


def record(dry):
    """Each port adds its own resonances, peaks clip at full scale, and a steep filter cuts above the band limit."""
    left = coloured(dry[0], LEFT_CAVITY, keep_power=False)
    right = coloured(dry[1], RIGHT_CAVITY, keep_power=False)
    ports = np.clip(np.vstack([left, right]), -1, 1)
    return filtered(ports, lambda hz: 1 / (1 + (hz / TOP_HZ) ** 80))


dry = scene()
out = record(dry)
output_pcm(out)
```